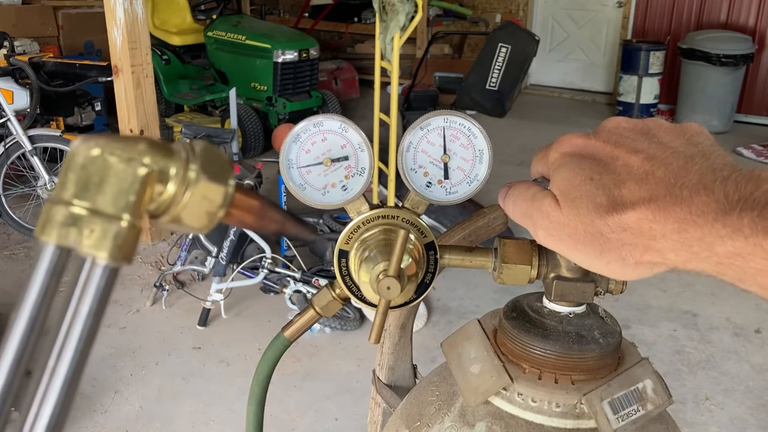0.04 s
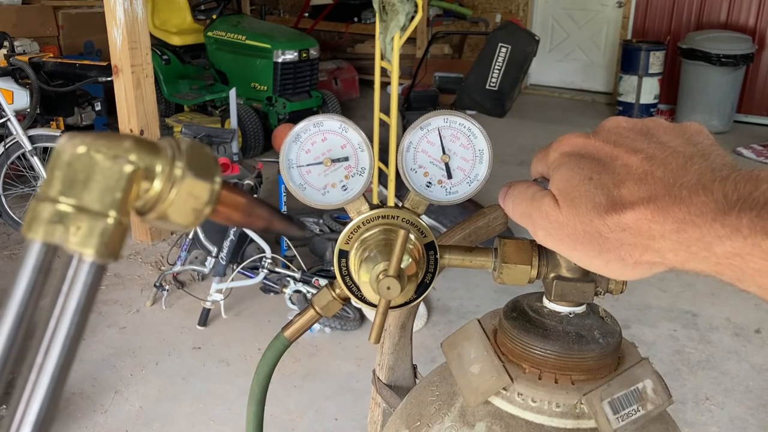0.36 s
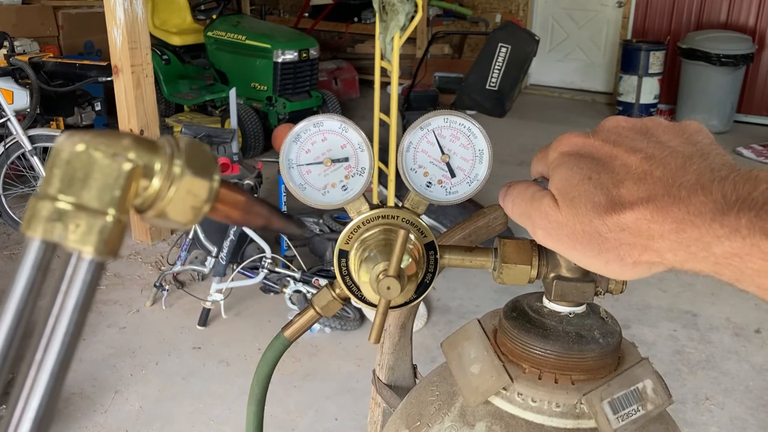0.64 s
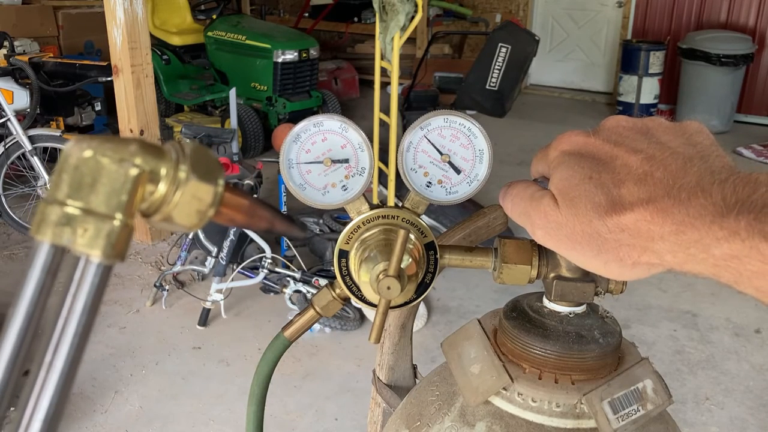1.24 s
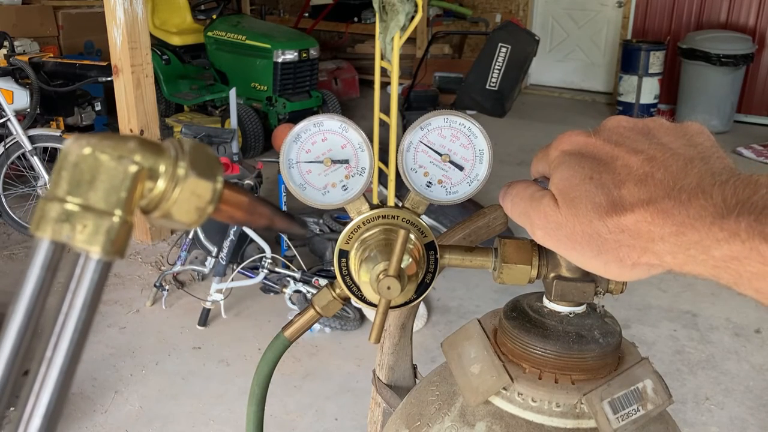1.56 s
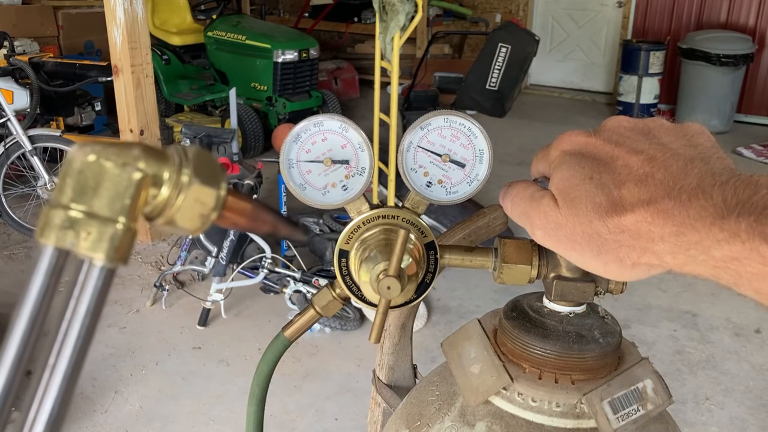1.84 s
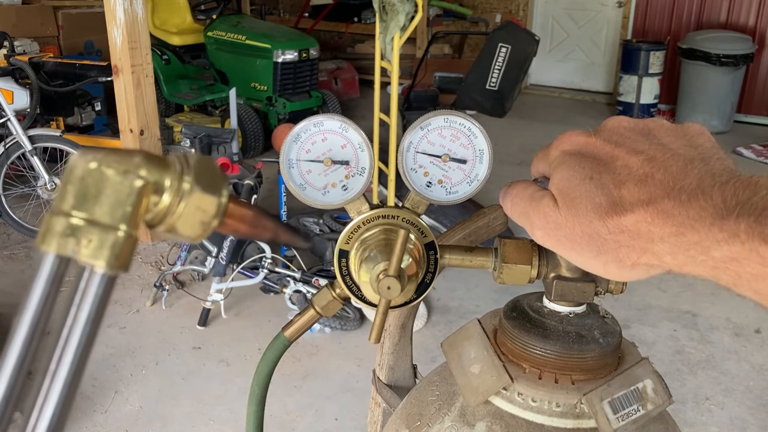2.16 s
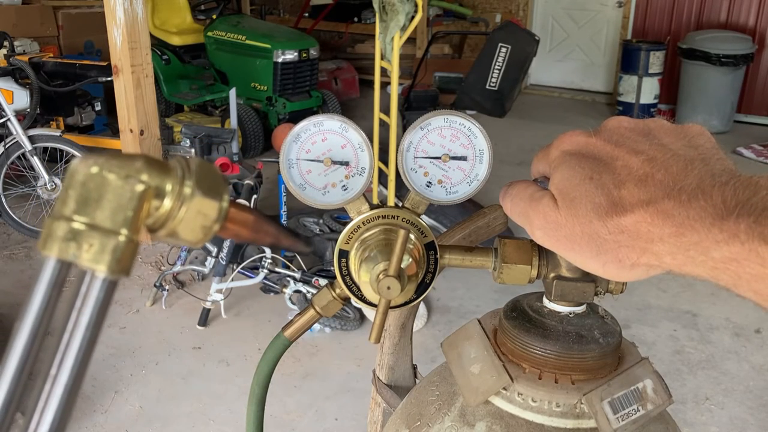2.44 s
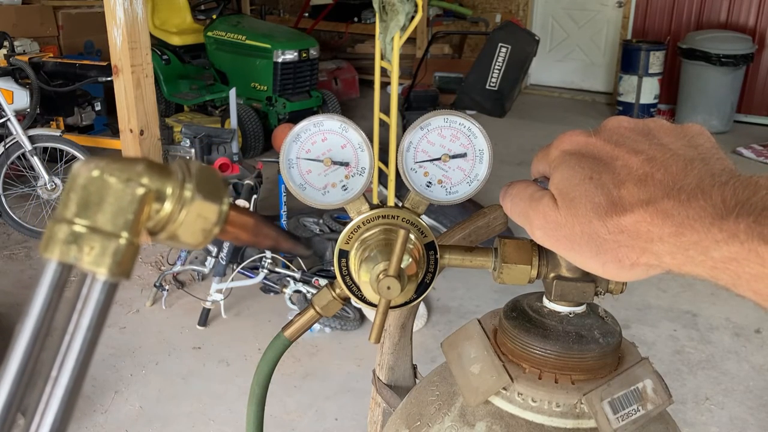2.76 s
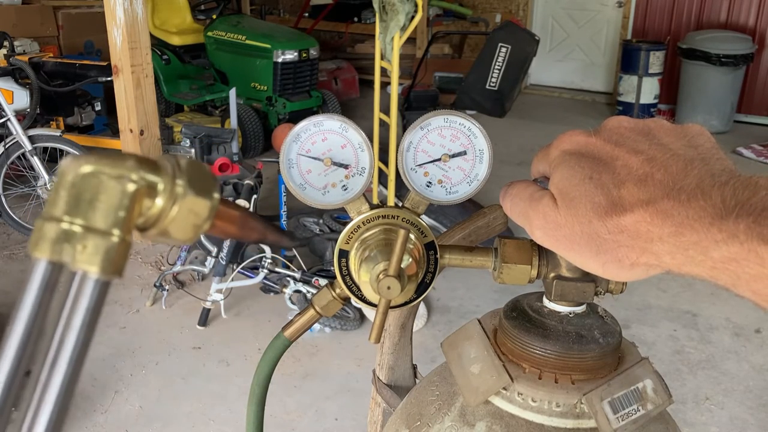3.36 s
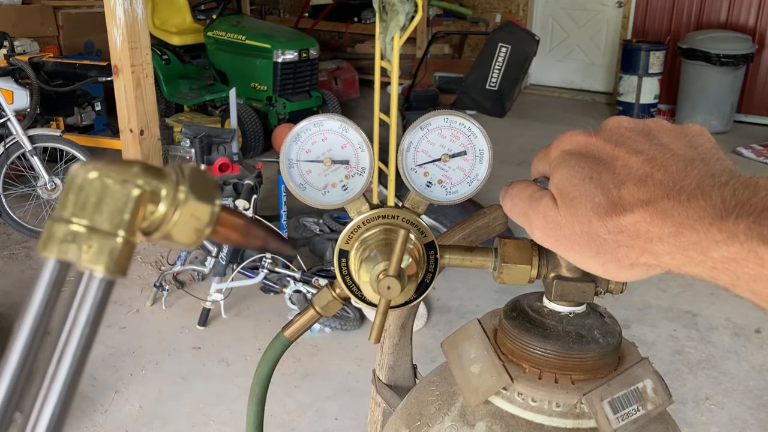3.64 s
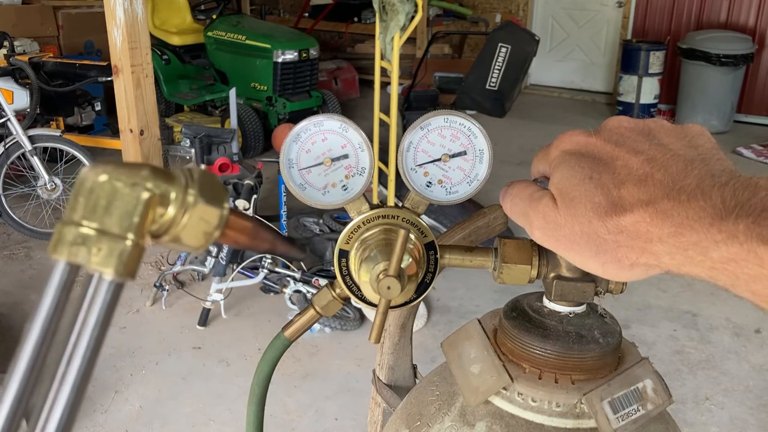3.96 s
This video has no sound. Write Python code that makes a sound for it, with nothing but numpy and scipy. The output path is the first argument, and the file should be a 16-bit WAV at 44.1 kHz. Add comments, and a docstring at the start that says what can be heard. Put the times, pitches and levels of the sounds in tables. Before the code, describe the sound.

A close, bright hiss of gas from a torch grows gradually in a garage, over a faint rumble and hum. The flow shuts off, leaving a short room ring, then reopens with a soft puff and starts fading.

```python
"""A bright hiss: compressed gas jets from a torch tip close to the microphone, in a garage.
The turbulent jet slowly swells, is shut off for a moment, reopens with a tick and a soft puff,
and fades as the pressure runs down.
The room rings on in the pause, over a low rumble and a faint hum."""
import sys
import numpy as np
from scipy import signal
from scipy.fft import rfft, irfft, next_fast_len
from scipy.io import wavfile
from scipy.ndimage import map_coordinates

SR = 44100
rng = np.random.default_rng(int(sys.argv[2]) if len(sys.argv) > 2 else 0)


def put_to_file(sound):
    """Save the sound as 16-bit audio at rate SR, in the file named by the first command-line argument."""
    columns = np.atleast_2d(sound).T  # one column per channel
    safe = np.clip(columns, -1, 1)
    whole_steps = np.round(safe * 32767)
    wavfile.write(sys.argv[1], SR, whole_steps.astype(np.int16))


N = 176400

# left-right likeness of jet and tick noise: freq_hz, correlation
HISS_CORRELATION = [(400, .3), (900, .1), (1500, .65), (2300, .6), (2550, .25), (2750, 1), (2980, 1),
                    (3400, .35), (4500, .35), (4900, .65), (5600, .35), (6150, .6), (6400, .98),
                    (7150, .98), (7700, .8), (8600, .88), (9000, 1), (9400, 1), (10500, .81), (11350, .98),
                    (12600, .86), (13250, 1), (13800, 1), (14500, .89), (15700, .95)]
# left-right likeness of puffs and rumble: freq_hz, correlation
LOW_CORRELATION = [(60, .97), (160, .95), (350, .7), (700, .25), (3000, .1)]


def jet(t):
    """Turbulent hiss at the tip: more flow is louder and brighter."""
    # jet strength, valve open: time_s, level_db
    flow = [(0, -21.5), (.3, -21), (.8, -19.8), (1.3, -18.7), (1.5, -18.5), (2.1, -18.1), (2.25, -17.2),
            (2.9, -17.4), (2.99, -18.4), (3.45, -17.6), (3.55, -17.2), (3.68, -19.5), (3.8, -20.2),
            (3.88, -22.2), (4, -23.6)]
    # hiss spectrum: freq_hz, relative_db
    spectrum = [(40, -45), (250, -27), (550, -31), (1000, -25.5), (1600, -23.5), (2000, -21.3),
                (2500, -16.8), (2850, -18.8), (3250, -15), (3600, -16.6), (4300, -14.9), (4700, -17.3),
                (5100, -12), (5700, -12.8), (6200, -11), (7600, -7.4), (8200, -3), (9300, -.4),
                (10600, -4.1), (12100, -.2), (13600, -3), (15200, 1.1), (15800, -2.3)]
    # random shifts of colour: freq_hz, depth_db
    patches = [(1500, .7), (2500, 1.2), (3200, 2.7), (4600, 2.7), (5600, 1.3), (14000, .7)]
    # phase between the two microphone ports: freq_hz, left_lead_rad
    port_phase = [(100, 0), (1700, 0), (2000, .7), (2450, .6), (2700, 3), (3000, 3.2), (3300, 2.4),
                  (3900, 3.1), (4300, 0), (4600, -1.8), (4900, -.3), (5450, -2.6), (5800, 0), (7400, 0),
                  (8000, -1.65), (9200, -3.14), (11350, -6.28), (13550, -9.42), (15800, -12.57)]
    # balance between the ports: freq_hz, left_minus_right_db
    port_balance = [(300, 0), (1200, 2.2), (2500, .8), (5000, 0), (15000, 0)]
    split_hz, body_growth = 5700, 0.94  # the body swells less than the treble
    sides = np.array([[.5], [-.5]])

    def ports(hz):
        return amp(sides * along(port_balance, hz)) * np.exp(1j * sides * along(port_phase, hz))

    hiss = filtered(stereo_noise(spectrum, HISS_CORRELATION, patches), ports)
    body = filtered(hiss, lambda hz: 1 / (1 + (hz / split_hz) ** 4))
    treble = hiss - body
    flow_db = np.interp(t, *np.transpose(flow))
    swell_db = flow_db - flow_db.mean()
    swelling_hiss = amp(swell_db) * treble + amp(body_growth * swell_db) * body
    flutter_db = 0.4 * wobble(rate_hz=240)
    waver_db = 0.56 * wobble(rate_hz=16)
    return valve(t) * amp(flow_db.mean() + flutter_db + waver_db) * swelling_hiss


def valve(t):
    """Share of the flow let through: a quick closing, then a rounded opening."""
    shut_s, fall_s = 3.0, .009
    open_s, rise_s, depth_db = 3.412, .023, 46
    closing = .5 - .5 * np.tanh((t - shut_s) / (2 * fall_s))
    opening = amp(-depth_db * np.exp(-np.maximum(t - open_s, 0) / rise_s))
    return np.where(t < open_s, closing, opening)


def valve_tick(t):
    """A tiny crack as the valve leaves its seat."""
    # tick spectrum: freq_hz, relative_db
    spectrum = [(1000, -24), (3500, -5), (8000, 0), (10500, -2), (13000, -22)]
    start_s, level_db, t60_s = 3.408, -50.5, .014
    age_s = np.maximum(t - start_s, 0)
    envelope = (t > start_s) * amp(level_db) * np.exp(-np.log(1000) * age_s / t60_s)
    return envelope * stereo_noise(spectrum, HISS_CORRELATION)


def air_puffs(t):
    """Soft, low gusts of air; the stronger comes as the jet restarts."""
    # gusts: start_s, level_db
    gusts = [(1.79, -50.5), (3.44, -48)]
    # gust spectrum: freq_hz, relative_db
    spectrum = [(30, -25), (110, 0.5), (280, 0.5), (600, -11.5), (1500, -10.5), (5000, -79)]
    rise_s = 0.044
    envelope = 0
    for start_s, level_db in gusts:
        progress = np.maximum(t - start_s, 0) / rise_s
        envelope += amp(level_db) * progress * np.exp(1 - progress)
    return envelope * stereo_noise(spectrum, LOW_CORRELATION)


def garage_reverb(x):
    """Diffuse reverberation; the treble dies first."""
    # decay time: freq_hz, t60_s
    decay_times = [(500, 1.1), (2000, 1.1), (4000, 0.8), (8000, 0.66), (14000, 0.39)]
    # reverberation over direct sound: freq_hz, gain_db
    wet_gains = [(500, -19.5), (1800, -13), (2850, -13), (4000, -15.5), (8000, -25), (14000, -24)]
    hz, t, noise = signal.stft(rng.standard_normal((2, SR)), SR, nperseg=256)
    t60_s = along(decay_times, hz)[:, None]
    decay = np.exp(-np.log(1000) * t / t60_s)
    decay /= np.sqrt(SR * np.mean(decay ** 2, axis=1, keepdims=True))  # unit energy per band
    gain = amp(along(wet_gains, hz))[:, None]
    tail = signal.istft(noise * decay * gain, SR, nperseg=256)[1]
    return signal.fftconvolve(x, tail, axes=1)[:, :N]


def background(t):
    """Low rumble that swells and sinks, with a faint, wavering hum."""
    # rumble spectrum: freq_hz, relative_db
    spectrum = [(22, -34), (32, -23), (48, -.5), (80, .5), (120, -.5), (165, -8.3), (300, -14.5),
                (480, -23), (750, -23), (1150, -21.5), (2000, -28), (3000, -34), (6000, -47), (15000, -63)]
    # rumble strength: time_s, level_db
    levels = [(0, -50.3), (.9, -50), (1.27, -50.5), (1.42, -46.5), (1.55, -49.5), (1.7, -45.5), (2, -49),
              (2.75, -50), (2.92, -46.2), (3.35, -50), (3.68, -47.3), (4, -48.3)]
    hum_hz, hum_db = 88.3, -62.5
    hum = unit_rms(np.sin(2 * np.pi * hum_hz * t + 0.29 * wobble(rate_hz=3.2)))
    rumble_db = np.interp(t, *np.transpose(levels)) + 0.67 * wobble(rate_hz=7.8)
    return amp(rumble_db) * stereo_noise(spectrum, LOW_CORRELATION) + amp(hum_db) * hum


def stereo_noise(spectrum, correlation, patches=None):
    """Shaped noise of rms 1, optionally mottled."""
    def mid_side_gains(hz):
        angle_rad = np.arccos(np.clip(along(correlation, hz), -1, 1)) / 2
        return amp(along(spectrum, hz)) * [np.cos(angle_rad), np.sin(angle_rad)]

    pair = rng.standard_normal((2, N))
    if patches:
        pair = mottled(pair, patches)
    mid, side = filtered(pair, mid_side_gains)
    return unit_rms(np.array([mid + side, mid - side]))


def mottled(x, patches):
    """Narrow bands swell and sink at random, keeping their mean power."""
    width_hz, life_s = 170, .09
    hz, t, bands = signal.stft(x, SR, nperseg=1024)
    knots = rng.standard_normal((int(hz[-1] / width_hz) + 2, int(t[-1] / life_s) + 2))
    field = map_coordinates(knots, np.meshgrid(hz / width_hz, t / life_s, indexing='ij'))
    gain = amp(along(patches, hz)[:, None] * field)
    gain /= np.sqrt(np.mean(gain ** 2, axis=1, keepdims=True))
    return signal.istft(bands * gain, SR, nperseg=1024)[1][:, :N]


def amp(db):
    """Decibels to gain."""
    return 10 ** (np.asarray(db) / 20)


def unit_rms(x):
    """Scale to rms 1."""
    return x / np.sqrt(np.mean(x ** 2) + 1e-20)


def along(points, hz):
    """Interpolate (freq_hz, value) points on a log axis."""
    freq_hz, values = np.transpose(points)
    return np.interp(np.log(hz + 1), np.log(freq_hz + 1), values)


def wobble(rate_hz):
    """Smooth random curve, rate_hz knots a second."""
    knots = rng.standard_normal(int(N * rate_hz / SR) + 4)
    return map_coordinates(knots, [np.arange(N) * rate_hz / SR])


def filtered(x, response):
    """Apply the frequency response response(hz)."""
    size = next_fast_len(N + SR // 2)
    hz = np.fft.rfftfreq(size, 1 / SR)
    return irfft(rfft(x, size) * response(hz), size)[..., :N]


def scene():
    """The torch in the garage."""
    t = np.arange(N) / SR
    torch = jet(t) + valve_tick(t) + air_puffs(t)
    return torch + garage_reverb(torch) + background(t)


def record(dry):
    """Steep low-pass at the recorder's band limit."""
    cutoff_hz, edge_hz = 15760, 70
    return filtered(dry, lambda hz: .5 - .5 * np.tanh((hz - cutoff_hz) / edge_hz))


dry = scene()
out = record(dry)
put_to_file(out)
```